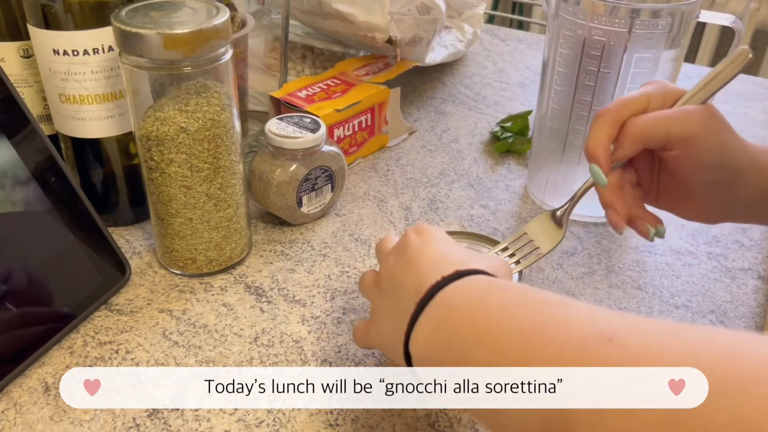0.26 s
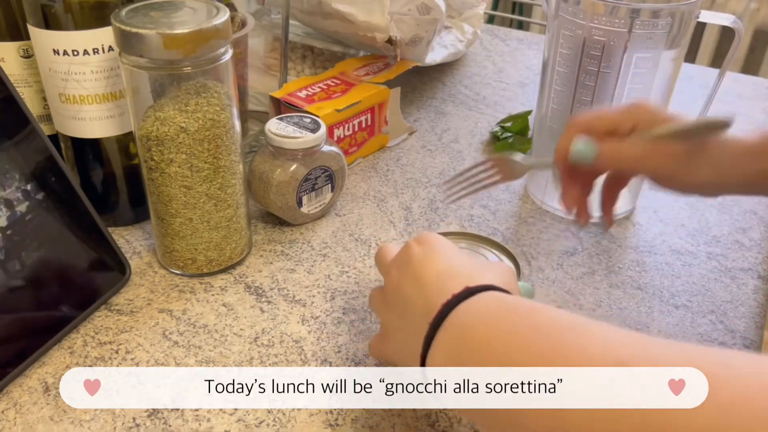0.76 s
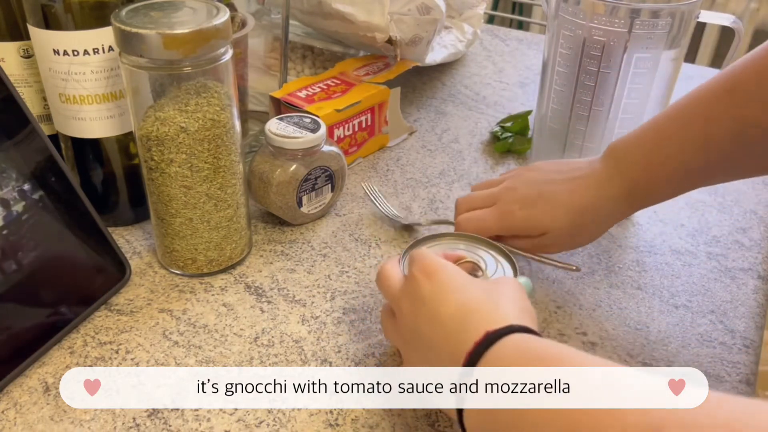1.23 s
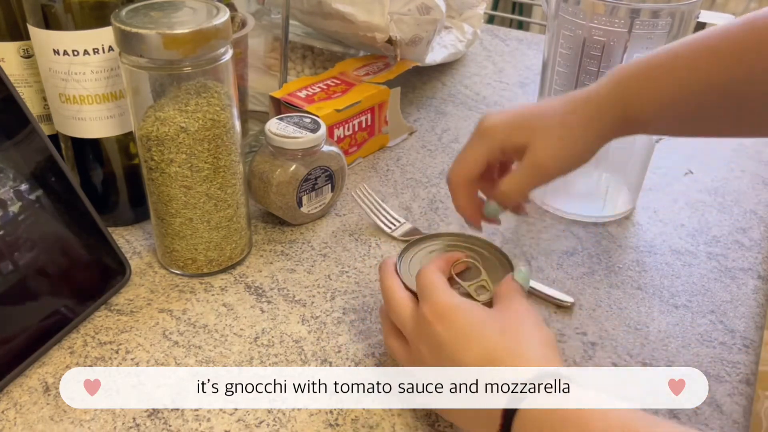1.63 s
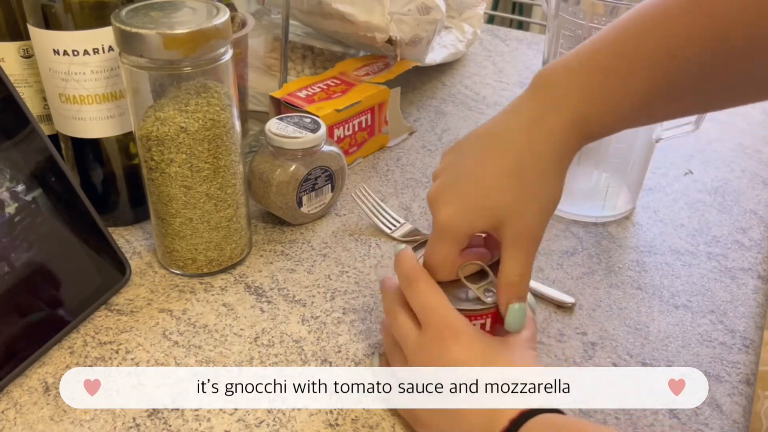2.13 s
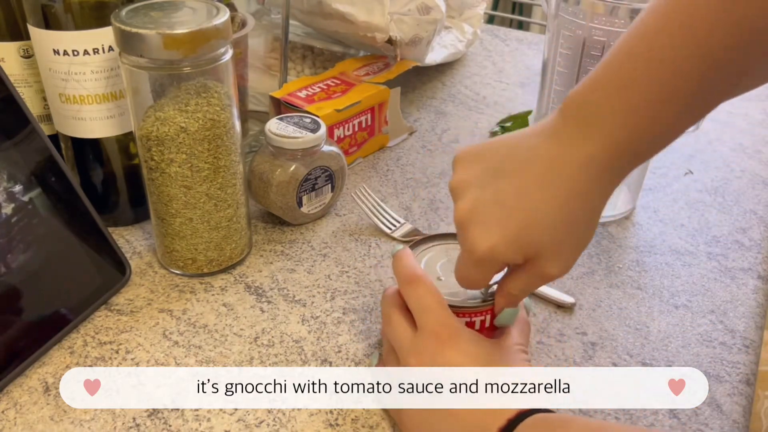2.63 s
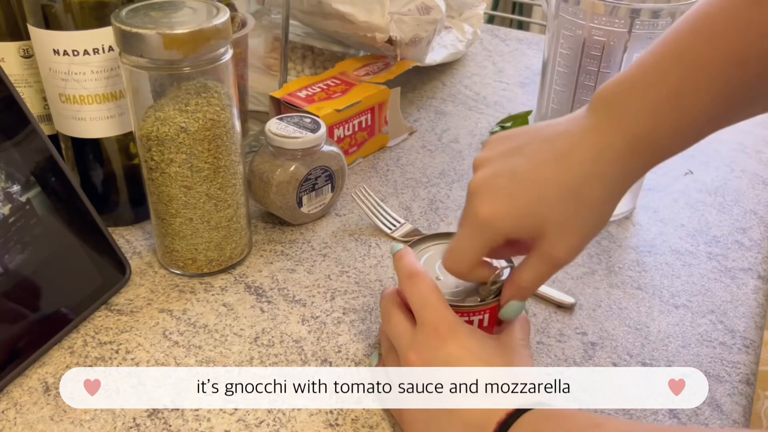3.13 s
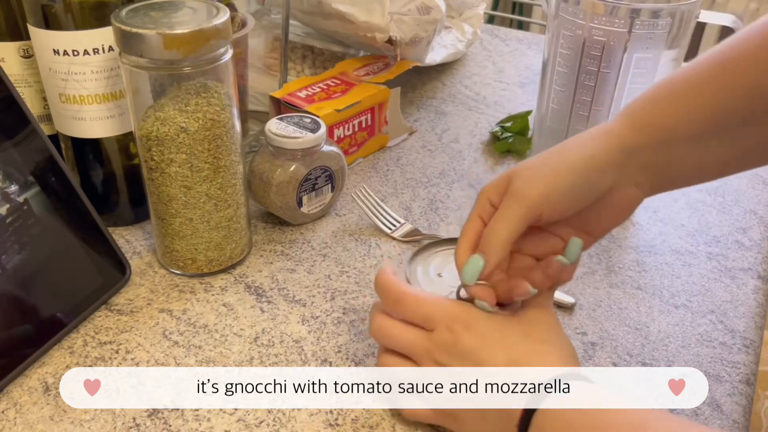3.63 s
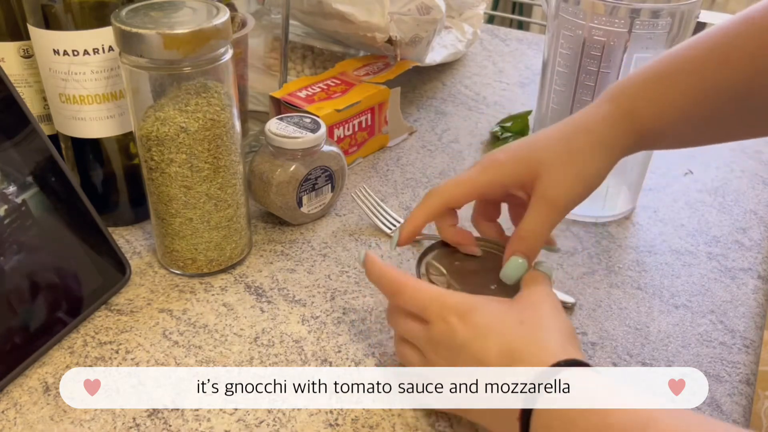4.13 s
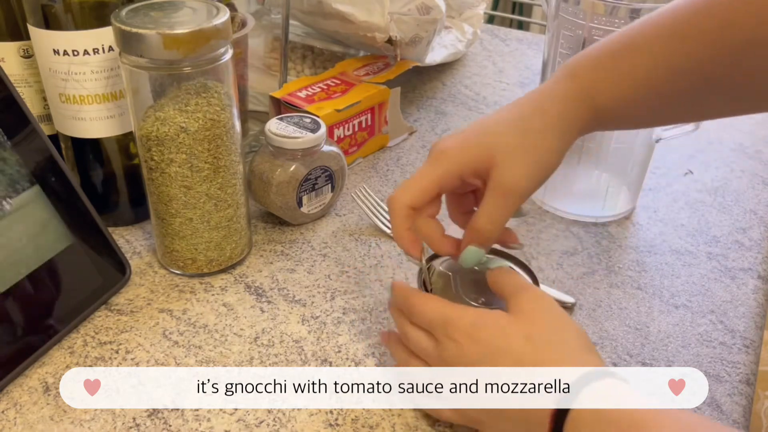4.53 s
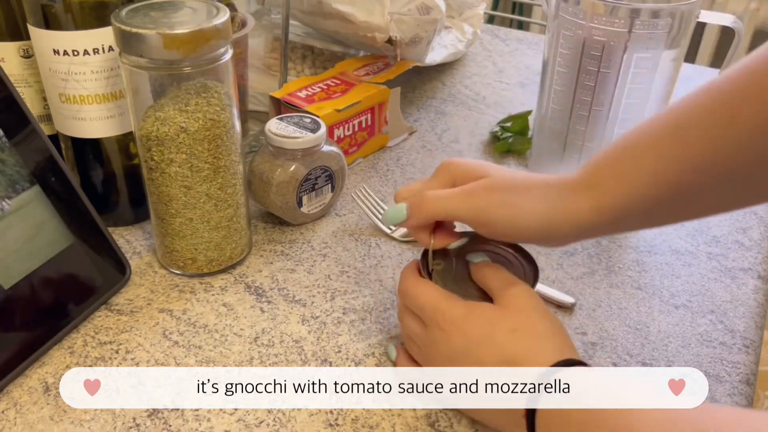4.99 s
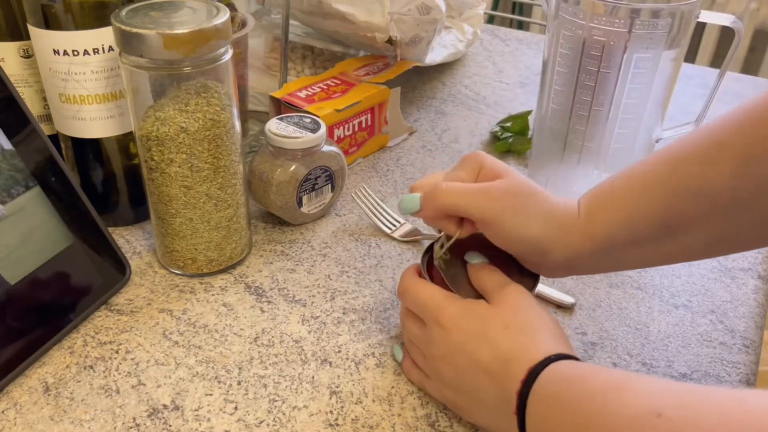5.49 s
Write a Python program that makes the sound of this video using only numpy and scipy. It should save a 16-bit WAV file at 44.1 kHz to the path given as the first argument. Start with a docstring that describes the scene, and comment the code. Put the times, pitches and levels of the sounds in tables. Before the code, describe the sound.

Light fork clicks, a metal can knocking and scraping on stone, and a ring-pull lid cracking open in an echoing kitchen.

```python
"""A hard-walled kitchen with a stone counter. A fork pecks at the ring pull of a tin can and is laid down
ringing. The can is shoved and dragged round, its rim sticking and slipping on the stone and shaking the
counter. Fingers brush the tin, nails tick on the tab, and the thin lid pops as the seal cracks. The can
is turned again; the score line starts to rip and the fold of the lid creaks. The walls echo."""
import sys
import numpy as np
from scipy import signal
from scipy.fft import rfft, irfft, next_fast_len
from scipy.io import wavfile
from scipy.ndimage import uniform_filter1d

SR = 44100
rng = np.random.default_rng(int(sys.argv[2]) if len(sys.argv) > 2 else 0)


def file_out(sig):
    """Save sig as 16-bit WAV at sys.argv[1]."""
    # one column per channel
    cols = np.atleast_2d(sig).T
    # limit, then scale
    lim = np.clip(cols, -1, 1)
    pcm = np.round(lim * 32767).astype(np.int16)
    wavfile.write(sys.argv[1], SR, pcm)


N = 253575


def amp(db):
    """Decibels to gain."""
    return 10 ** (np.asarray(db) / 20)


def unit(x):
    """x at rms 1."""
    return x / np.sqrt(np.mean(x ** 2) + 1e-20)


def along(points, hz):
    """(f/Hz, value) points read on a log axis."""
    f, v = np.transpose(points)
    return np.interp(np.log(hz + 1), np.log(f + 1), v)


def add(track, at_s, sound):
    """Mix a sound into the track."""
    part = track[..., round(at_s * SR):][..., :sound.shape[-1]]
    part += sound[..., :part.shape[-1]]


def swell(peak_s, rise_s=.043, fall_s=.037, hold_s=0):
    """Gain that rises to 1, holds and falls; 22.5 dB down at rise_s before and fall_s after."""
    t = np.arange(N) / SR - peak_s
    away = np.maximum(0, np.maximum(-t / rise_s, (t - hold_s) / fall_s))
    return amp(-22.5 * np.minimum(away, 10) ** 1.266)


def wander(*spans_samples):
    """Slow random drift at rms 1: noise through moving averages."""
    drift = rng.standard_normal(N)
    for span in spans_samples:
        drift = uniform_filter1d(drift, span)
    return unit(drift)


def colour(x, spectrum, resonances=()):
    """Minimum-phase filter: spectrum (f/Hz, level/dB) plus resonances (f/Hz, width/Hz, lift/dB)."""
    m = 2 * next_fast_len(x.shape[-1] // 2 + 4096)
    hz = np.fft.rfftfreq(m, 1 / SR)
    peaks_db = sum(lift / (1 + (2 * (hz - f) / width) ** 2) for f, width, lift in resonances)
    cepstrum = irfft(np.log(amp(along(spectrum, hz) + peaks_db)))
    cepstrum[1:m // 2] *= 2
    cepstrum[m // 2 + 1:] = 0
    return irfft(rfft(x, m) * np.exp(rfft(cepstrum)), m)[..., :x.shape[-1]]


def resonate(x, hz, width_hz):
    """What one resonance picks out of x, at rms 1."""
    return unit(signal.lfilter(*signal.iirpeak(hz, hz / width_hz, SR), x))


def burst_spectrum(samples, t60_s):
    """Nearly flattened spectrum of a decaying noise burst."""
    t = np.arange(samples) / SR
    burst = rfft(rng.standard_normal(samples) * amp(-60 * t / t60_s))
    return burst / np.abs(burst) ** .8


def blow(spectrum, t60_s, resonances=(), lag_cycles=2.7):
    """A contact shakes crowded, damped modes; rms 1 over the first 10 ms."""
    m = SR // 2
    # The lows arrive just after the highs, giving each knock a quick downward sweep.
    lag = np.exp(-2j * np.pi * lag_cycles * np.log(np.fft.rfftfreq(m, 1 / SR) + 100))
    burst = irfft(burst_spectrum(m, t60_s) * lag, m)[:SR // 4]
    x = colour(burst, spectrum, resonances)
    return np.pad(x, (0, SR * 3 // 4 - len(x))) / np.sqrt(np.mean(x[:SR // 100] ** 2))


def ring(modes, attack_s=.00018):
    """Damped modes (f/Hz, level/dB, t60/s), struck at new strengths; rms 1 before attack and decay."""
    t = np.arange(SR * 3 // 4) / SR
    hz, db, t60_s = np.transpose(modes)[:, :, None]
    level = amp(db + rng.standard_normal(hz.shape) - 60 * t / t60_s)
    x = np.sum(level * np.sin(2 * np.pi * (hz * t + rng.random(hz.shape))), 0)
    return x * (1 - np.exp(-t / attack_s)) / np.sqrt(np.sum(level[:, 0] ** 2) / 2)


def friction(rate_hz, jitter, spread_db, hiss_db):
    """Stick-slip pulses of uneven spacing and size over the hiss of the finest roughness."""
    gap_draw, size_draw = rng.standard_normal((20000, 2)).T
    at = (np.cumsum(np.exp(jitter * gap_draw)) * SR / rate_hz).astype(int)
    size = amp(spread_db * np.clip(size_draw, -2, 2))
    slips = np.bincount(at[at < N], size[at < N], N)
    return unit(slips - slips.mean()) + amp(hiss_db) * rng.standard_normal(N)


# Echo decay: f/Hz, t60/s
ECHO_T60 = [(60, 0.97), (200, 0.43), (700, 0.47), (1600, 0.55), (4000, 0.51), (7000, 0.47), (12000, 0.19),
            (16000, 0.26)]
# Echo likeness: f/Hz, left-right correlation
ECHO_COHERENCE = [(100, 0.89), (290, 0.99), (640, -0.15), (1400, -0.1), (3000, 0.0073), (7000, -0.056),
                  (9300, 0.93), (12000, 0.82), (15000, .1)]
def in_kitchen(x, wet_db, left_db=1):
    """Direct sound plus the diffuse echo of hard walls, in stereo."""
    hz, t, noise = signal.stft(rng.standard_normal((2, int(.8 * SR))), SR, nperseg=256)
    t60_s = along(ECHO_T60, hz)[:, None]
    angle = np.arccos(np.clip(along(ECHO_COHERENCE, hz), -1, 1))[:, None] / 2
    tail = noise * amp(-60 * t / t60_s) * (1 - np.exp(-t / .004))
    tail *= np.array([np.cos(angle), np.sin(angle)])
    mid, side = signal.istft(tail, SR, nperseg=256)[1] * np.sqrt(np.log(1e6) / (SR * t60_s.mean()))
    response = amp(wet_db) * np.array([mid + side, mid - side])
    response[:, 0] += amp([left_db / 2, -left_db / 2])
    return signal.fftconvolve(x[None], response, axes=1)[:, :N] / np.hypot(1, amp(wet_db))


# Room noise: f/Hz, level/dB
MURMUR = [(25, 9), (60, -1.5), (150, -5.5), (300, -2), (900, -28), (1900, -19.5), (2700, -36.5),
          (5000, -35.5), (8000, -26), (12000, -24.5), (13500, -41.5), (16000, -47)]
def house_murmur():
    """The low murmur of the house and a faint hiss."""
    common, left, right = colour(rng.standard_normal((3, N)), MURMUR)
    return amp(-59) * unit(common + .22 * np.array([left, right]))


# Finger strokes: t/s, length/s, skin/dB, fizz/dB
STROKES = [(1.343, 0.022, -59, -80), (1.935, 0.36, -64.5, -76.5), (2.66, 0.039, -64.5, -82.5),
           (3.005, 0.14, -62.5, -64.5), (3.366, 0.12, -72, -63), (3.51, 0.14, -51.5, -66),
           (3.756, 0.077, -63, -67), (4.028, 0.3, -57, -67), (4.534, 0.393, -64, -87)]
# Skin rub, its fizz, nail slide: f/Hz, level/dB
SKIN_RUB = [(1500, -35.5), (2800, 7.5), (4200, 3.5), (5800, 5.5), (8000, -5.5), (12500, -11), (16000, -6.5)]
SKIN_FIZZ = [(6000, -29.5), (10000, -13.5), (12500, -5), (14000, -2.5), (16000, -7.5)]
NAIL_SLIDE = [(3500, -21), (5000, -4), (7200, 5), (9000, -11), (13000, -19), (16000, -14)]
# Resonances under skin and nail: f/Hz, width/Hz, lift/dB
SKIN_PEAKS = [(3820, 220, 3), (5460, 350, 7)]
SLIDE_PEAKS = [(5240, 400, 11), (6750, 300, 4)]
def fingers():
    """Fingers brush the tin with a fine fizz; one nail slides along the tab and makes it sing."""
    pressures = [swell(s, hold_s=length_s) for s, length_s, _, _ in STROKES]
    _, _, skin_db, fizz_db = np.transpose(STROKES)
    rub = friction(rate_hz=250, jitter=.9, spread_db=-.5, hiss_db=2)
    skin = amp(skin_db) @ pressures * unit(colour(rub, SKIN_RUB, SKIN_PEAKS))
    fizz = amp(fizz_db) @ pressures * unit(colour(rub, SKIN_FIZZ))
    sliding = friction(rate_hz=500, jitter=.7, spread_db=3, hiss_db=0)
    nail = amp(-48.5) * swell(3.52, .085, .07) * unit(colour(sliding, NAIL_SLIDE, SLIDE_PEAKS))
    return in_kitchen(skin + fizz + nail, wet_db=3)


# Nail flicks: t/s, click/dB, tab/dB, freedom to ring/0-1, tab f/Hz, click f/Hz
FLICKS = [(2.6628, -56, -42.5, 1, 3800, 8400), (2.8006, -53.5, -51, 0.66, 3640, 12760),
          (3.1102, -37.5, -30.5, 1, 3733, 12600), (3.409, -47, -76, .3, 3700, 12700),
          (4.0085, -46, -38, 1, 3600, 12500), (4.0485, -41.5, -38, 0.6, 3890, 6300),
          (4.0986, -42.5, -43.5, 1, 3860, 13500), (4.1666, -51, -37.5, 0.2, 3470, 11900),
          (4.3, -43.5, -42.5, 0.5, 3560, 6660), (4.386, -54.5, -64, .4, 3700, 7400),
          (4.4361, -46.5, -60, 0.1, 3630, 6700), (4.985, -60.5, -56.5, 0.24, 3700, 6940)]
# Blows of nail on tin, on the tab, on the can's base: f/Hz, level/dB
NAIL_CLICK = [(700, -25), (2200, -13), (4000, -7.5), (7000, -5), (9000, -2), (13000, -0.5), (16000, -4)]
TAB_BLOW = [(300, 2), (900, -1.5), (2000, 1), (3800, -3.5), (5000, -5), (8000, -11.5), (14000, -28.5)]
BASE_KNOCK = [(150, -33.5), (280, -5.5), (380, -2.5), (520, -1.5), (680, -13), (900, -10), (1400, -11),
              (4000, -65)]
# Resonances of the tab and of the full can on stone: f/Hz, width/Hz, lift/dB
TAB_PEAKS = [(1110, 180, 16.5), (1428, 27, 8.5), (1900, 150, 13.5), (2165, 120, 8.5), (2380, 110, -1),
             (2980, 380, 8), (3190, 100, -12), (3786, 410, 15)]
CAN_PEAKS = [(358, 27, 2.5), (454.5, 18, 3), (503.7, 110, 5), (650.6, 53, 10), (741, 7.8, 5),
             (808, 30, 4.5), (993, 30, 8), (1102, 19, 1.5), (1209, 30, 6), (1262, 41, 7.5),
             (1364, 110, 0.5), (1377, 62, 5), (1726, 45, 8), (2140, 11, 7), (2900, 31, 1), (3324, 72, 8)]
def tab_ticks():
    """Nails flick rim and tab; the tab shifts pitch as it bends and rings less under a finger."""
    out = np.zeros((2, N))
    for s, click_db, tab_db, freedom, tab_hz, click_hz in FLICKS:
        bend = tab_hz / TAB_PEAKS[-1][0]
        peaks = [(hz * bend, width, freedom * lift) for hz, width, lift in TAB_PEAKS]
        ping = freedom * amp(-11) * ring([(tab_hz, 0, .053)])
        tab = blow(TAB_BLOW, .015, peaks) + ping + amp(-20) * blow(BASE_KNOCK, .021, CAN_PEAKS)
        click = blow(NAIL_CLICK, .016, [(click_hz, 1300, 9.5)], lag_cycles=1.2)
        add(out, s, in_kitchen(amp(click_db) * click + amp(tab_db) * tab, wet_db=-2.5))
    return out


# Tine contacts: t/s, click/dB, thump/dB, knock/dB, tin/dB, tines/dB
PECKS = [(0.191, -48, -51, -45.5, -64, -76), (0.366, -36.5, -40.5, -45.5, -37, -55),
         (0.462, -38.5, -54.5, -42.5, -50, -79), (1.09, -49, -51, -41, -78, -37.5)]
# Blow on the can's wall, sharp click, damped clink of tines: f/Hz, level/dB
WALL_KNOCK = [(500, -39.5), (900, -4), (1400, -3.5), (2000, -4), (2600, -20), (4000, -25), (8000, -43.5)]
SHARP_CLICK = [(700, -27), (2200, -9), (4000, -2), (7000, 0), (9000, -2), (13000, 1.5), (16000, -6.5)]
DAMPED_CLINK = [(1500, -15), (2600, -2), (6000, -4.5), (9000, -7), (16000, -14)]
# Resonances of rim and tines: f/Hz, width/Hz, lift/dB
RIM_PEAKS = [(1260, 25, 10), (1530, 41, 14.5), (1897, 570, 10.5), (2350, 150, 9.5), (2900, 310, 6.5),
             (3370, 270, -5), (4040, 130, 4.5), (4550, 250, -5), (5030, 110, 8), (6020, 140, 8.5),
             (6715, 270, -11), (13000, 1200, 7)]
TINE_PEAKS = [(3000, 350, 15.5), (3650, 250, -5.5), (4480, 220, 5), (5460, 400, 7.5)]
# Modes of counter and tines: f/Hz, level/dB, t60/s
COUNTER_MODES = [(60.6, -6.5, 0.75), (79, -11.5, 0.49), (118.4, 0.5, 0.49), (164.8, 12.5, 0.17)]
TINE_MODES = [(3020, -16.5, .15), (7736, -5, 0.26), (9680, -3, 0.07), (10740, -7, 0.42), (15320, 3, 0.06)]
def fork_pecks():
    """The tines peck at the tab, then touch down on the counter."""
    out = np.zeros((2, N))
    for s, click_db, thump_db, knock_db, tin_db, tines_db in PECKS:
        thump = amp(thump_db) * ring(COUNTER_MODES, attack_s=.0054)
        knock = amp(knock_db) * blow(BASE_KNOCK, .035, CAN_PEAKS)
        tin = amp(tin_db) * blow(WALL_KNOCK, .07, RIM_PEAKS)
        click = amp(click_db) * blow(SHARP_CLICK, .02, RIM_PEAKS)
        tines = amp(tines_db) * (ring(TINE_MODES) + amp(-5.5) * blow(DAMPED_CLINK, .04, TINE_PEAKS))
        add(out, s, in_kitchen(thump + knock + tin + click + tines, wet_db=2))
    return out


# Fork heel on stone: f/Hz, level/dB
HEEL_KNOCK = [(150, -25), (270, -15.5), (360, -5.5), (460, -0.5), (600, -6), (1250, -6), (1700, -11.5),
              (2100, -17.5), (2500, -31), (3100, -29.5), (4000, -39.5), (8000, -42), (14000, -63.5)]
# Its resonances: f/Hz, width/Hz, lift/dB
HEEL_PEAKS = [(465, 98, 4.8), (653, 37, 2.8), (781, 48, 4), (1010, 70, 9.3), (1230, 60, 2.1)]
def fork_heel():
    """The heel of the fork drops on the stone with a dull knock."""
    out = np.zeros((2, N))
    knock = amp(-26) * blow(HEEL_KNOCK, .042, HEEL_PEAKS)
    thump = amp(-40.5) * ring(COUNTER_MODES, attack_s=.0057)
    add(out, 1.191, in_kitchen(knock + thump, wet_db=1))
    return out


# Fork strikes: t/s, tips/dB, stem/dB, click/dB
FORK_STRIKES = [(1.094, -56, -67, -46), (1.513, -31, -20.5, -21), (1.561, -38.5, -30, -45)]
# Modes of stem and tine tips: f/Hz, level/dB, t60/s
STEM_MODES = [(972, -9, 1.9), (1571, -2, .6), (1718, -5, .7), (2169, 1, .95), (2394, -2, .5),
              (2768, -2, .5), (3316, -3, .45), (3403, -5, .4), (3461, 0, .78), (5247, -20, 1.1),
              (6944, -16, .85)]
TIP_MODES = [(11855, 0, .38), (11981, -1, .27)]
def fork_clinks():
    """The fork rings as it lands and as the can bumps it; two high modes beat at the tips."""
    out = np.zeros((2, N))
    for s, tips_db, stem_db, click_db in FORK_STRIKES:
        add(out, s, in_kitchen(amp(click_db) * blow(SHARP_CLICK, .012), wet_db=0))
        add(out, s, in_kitchen(amp(stem_db) * ring(STEM_MODES), wet_db=-10))
        add(out, s, amp(tips_db) * ring(TIP_MODES) * amp([[-1], [1]]))
    return out


# Pushes on the can: peak t/s, rise/s, fall/s, scrape/dB, thrum/dB, grip f/Hz
PUSHES = [(0.005, 0.071, 0.032, -52.5, -49, 504), (0.167, 0.072, 0.043, -46.5, -42.5, 373),
          (0.368, 0.034, 0.065, -45.5, -44, 402), (0.89, 0.17, 0.2, -59, -54, 513),
          (1.39, 0.13, 0.026, -53, -76, 770), (2.009, 0.056, 0.058, -32, -34, 499.5),
          (2.285, 0.16, 0.077, -59.5, -58, 500), (2.751, 0.39, .15, -51, -59.5, 520),
          (3.07, 0.11, 0.19, -55, -64.5, 480), (3.385, 0.15, 0.079, -55, -61, 513),
          (3.505, 0.16, 0.16, -45, -66, 520), (3.641, 0.088, 0.049, -21, -34, 677),
          (3.799, 0.19, 0.07, -31.5, -41.5, 902), (4.04, 0.073, 0.13, -48, -51, 746),
          (4.236, 0.11, 0.066, -28, -41.5, 1223), (4.57, 0.033, 0.039, -51, -54.5, 484),
          (4.705, 0.079, 0.039, -46, -46.5, 494), (4.862, 0.11, 0.073, -36, -53, 536),
          (4.95, 0.078, 0.039, -51, -42.5, 490)]
# Rubbing base, shaken counter: f/Hz, level/dB
BASE_RUB = [(190, -41.5), (300, -7.5), (450, 4.5), (700, 1), (1100, 1.5), (1500, -4.5), (2100, -8),
            (2900, -20.5), (5000, -53), (10000, -73.5)]
COUNTER_THRUM = [(25, -44.5), (48, -21.5), (66, -6.5), (90, -5), (120, 0), (137, -7.5), (153, 7),
                 (180, -12.5), (230, -13), (350, -55.5)]
def can_shoves():
    """The can is eased round: its base rubs in short pushes and rings at a pitch set by each grip."""
    force = amp(1.8 * wander(600, 300))
    slips = friction(rate_hz=180, jitter=.5, spread_db=2.5, hiss_db=-8)
    smear = irfft(burst_spectrum(1024, t60_s=.012))  # each slip spreads as it crosses the can
    rub = force * unit(signal.fftconvolve(slips, smear)[:N])
    rasp = unit(colour(rub, BASE_RUB, CAN_PEAKS))
    base, shaking = np.zeros((2, N))
    for s, rise_s, fall_s, scrape_db, thrum_db, grip_hz in PUSHES:
        grip_ring = amp(-7) * resonate(rub, grip_hz, width_hz=17)
        base += amp(scrape_db) * swell(s, rise_s, fall_s) * (rasp + grip_ring)
        # The counter shakes longer, and most as the can slows.
        shaking += amp(thrum_db) * swell(s + .46 * fall_s, 1.37 * rise_s, 1.37 * fall_s)
    thrum = shaking * unit(colour(rub, COUNTER_THRUM))
    return in_kitchen(base, wet_db=1) + in_kitchen(thrum, wet_db=-6.5)


# Catches of the base: t/s, click/dB, thump/dB, knock/dB, tin/dB
CATCHES = [(1.4494, -38, -49, -22.5, -21.5), (1.4884, -39, -60, -26, -28), (1.4924, -32, -29, -17, -19.5),
           (1.514, -13, -28.5, -16, -10), (1.5624, -14.5, -39, -23, -14), (1.596, -19, -48, -23, -17.5),
           (1.629, -20.5, -56, -35, -19), (1.824, -65, -42, -25, -38), (1.847, -54, -49.5, -34.5, -35),
           (3.792, -50, -49.5, -36, -38.5), (4.506, -80, -67, -37, -47), (4.537, -85, -46, -32.5, -45),
           (4.804, -77, -55.5, -38.5, -55)]
# Click on stone: f/Hz, level/dB
STONE_CLICK = [(1200, -20), (2600, 13.5), (3400, 3.5), (4500, -3), (7000, -2), (9000, -19), (13000, -14),
               (16000, -32.5)]
def can_knocks():
    """The base of the can catches on the stone and knocks free."""
    out = np.zeros((2, N))
    for s, click_db, thump_db, knock_db, tin_db in CATCHES:
        thump = amp(thump_db) * ring(COUNTER_MODES, attack_s=.0037)
        knock = amp(knock_db) * blow(BASE_KNOCK, .019, CAN_PEAKS)
        tin = amp(tin_db) * blow(WALL_KNOCK, .032, CAN_PEAKS)
        click = amp(click_db) * blow(STONE_CLICK, .039, CAN_PEAKS)
        add(out, s, in_kitchen(thump + knock + tin + click, wet_db=1))
    return out


# Scrape and grit of the dragged rim: f/Hz, level/dB
RIM_SCRAPE = [(190, -41.5), (280, -8), (370, -0.5), (560, -4), (780, -3), (1100, -3), (1600, -2.5),
              (2300, -10.5), (3200, -30), (5000, -50.5), (10000, -63)]
RIM_GRIT = [(1500, -20), (2600, 4.5), (3400, -2), (4300, -7), (7000, -13.5), (9000, -21.5), (12500, -23.5),
            (16000, -36)]
def can_drag():
    """The rim judders over the stone in clumps of slips and shakes the counter; the scrape dulls."""
    start_s, peak_s, hold_s, end_s = 1.456, 1.607, .067, 1.93
    rise_db_per_s, fall_db_per_s, dulling_db_per_s = 57, 108, 27.5
    thrum_spectrum = [(25, -27.5), (60, -9.5), (90, -1), (120, -2), (150, -3), (230, -9.5), (400, -44)]
    t = np.arange(N) / SR - peak_s
    moving = swell(start_s, .004, .04, hold_s=end_s - start_s)
    force = moving * amp(np.minimum(0, np.minimum(rise_db_per_s * t, fall_db_per_s * (hold_s - t))))
    judder = amp(2 * wander(350)) * friction(rate_hz=140, jitter=.45, spread_db=2, hiss_db=-3)
    scrape = force * amp(-16.5) * unit(colour(judder, RIM_SCRAPE, CAN_PEAKS))
    grit = force * amp(-25.5 - dulling_db_per_s * t) * unit(colour(judder, RIM_GRIT, CAN_PEAKS))
    thrum = force * amp(-38) * unit(colour(judder, thrum_spectrum))
    return in_kitchen(scrape + grit, wet_db=3.5) + in_kitchen(thrum, wet_db=-10)


# Squeaks of the torn edge: t/s, level/dB, f/Hz
EDGE_SQUEAKS = [(5.582, -52, 1960), (5.611, -51.5, 2300), (5.697, -57, 2660), (5.734, -57, 2700),
                (5.748, -49, 2980)]
def lid_creak():
    """The fold groans under a wavering pull; the torn edge squeaks higher as the bend tightens."""
    fold_spectrum = [(150, -18), (280, -5.5), (390, 1.5), (520, -9), (750, -19), (1400, -16.5),
                     (2200, -45), (4000, -52)]
    edge_spectrum = [(900, -6), (1900, 0), (2700, 2), (3500, -11.5), (6000, -12), (9000, -25),
                     (16000, -29)]
    pull = amp(-47.5 + 2 * wander(1500)) * swell(5.565, hold_s=.2)
    folding = friction(rate_hz=375, jitter=.6, spread_db=4, hiss_db=-8)
    chafing = friction(rate_hz=600, jitter=.6, spread_db=2.5, hiss_db=-3)
    groan = pull * unit(colour(folding, fold_spectrum))
    rasp = amp(4) * unit(colour(chafing, edge_spectrum))
    squeaks = sum(amp(db) * swell(s, .029, .011) * (rasp + resonate(rasp, hz, width_hz=200))
                  for s, db, hz in EDGE_SQUEAKS)
    return in_kitchen(groan + squeaks, wet_db=-7)


# Lid buckling, seal giving way: t/s, click/dB, thump/dB, knock/dB, lid/dB
BUCKLES = [(2.358, -46.5, -33.5, -35, -36.5), (2.4212, -22, -31.5, -31, -11),
           (5.362, -42.5, -30.5, -20.5, -27)]
# Lid pop: f/Hz, level/dB
POP = [(200, -12.5), (450, -24.5), (700, -9), (1300, -7.5), (1900, -2.5), (2400, -6.5), (3300, -14.5),
       (4500, -13), (8000, -30.5)]
# Flexing lid: f/Hz, width/Hz, lift/dB
LID_PEAKS = [(830, 93, 10.5), (1270, 47, 7), (1376, 140, 11), (1742, 220, 9.5), (2350, 140, 4.5),
             (3660, 290, 6.5), (5370, 290, -3)]
# Popped lid: f/Hz, level/dB, t60/s
LID_MODES = [(1372, -1.5, .03), (1640, 0, .022)]
def lid_snaps():
    """The thin lid pops, rings briefly and kicks the can against the counter."""
    out = np.zeros((2, N))
    for s, click_db, thump_db, knock_db, lid_db in BUCKLES:
        pop = amp(lid_db) * (blow(POP, .02, LID_PEAKS, lag_cycles=.7) + amp(-10) * ring(LID_MODES))
        click = amp(click_db) * blow(SHARP_CLICK, .016, lag_cycles=.664)
        knock = amp(knock_db) * blow(BASE_KNOCK, .0069, CAN_PEAKS)
        add(out, s, in_kitchen(pop + click + knock, wet_db=0, left_db=3))
        thump = amp(thump_db) * ring(COUNTER_MODES, attack_s=.0047)
        add(out, s, in_kitchen(thump, wet_db=-3.5))
    return out


# Tear envelope: t/s, level/dB
TEAR_LEVELS = [(5.32, -71), (5.33, -52), (5.341, -52.5), (5.352, -25), (5.364, -23), (5.372, -54)]
# Ripping tin: f/Hz, level/dB
TIN_RIP = [(300, -4), (1200, 1), (1950, 12.5), (2700, -3.5), (4000, -7), (5200, 2), (7000, 2.5), (9000, -9),
           (13000, -8.5), (16000, -17)]
def lid_tear():
    """The score line rips in tiny fractures; the sudden give jolts the can and thuds in the counter."""
    jolt_spectrum = [(250, -1.5), (520, -14.5), (800, -1.5), (1300, 2.5), (1800, -9.5), (4000, -54)]
    thud_modes = [(58, -21.5, .33), (71.5, -2.5, .22), (97.3, -8, .55)]
    t = np.arange(N) / SR
    s, db = np.transpose(TEAR_LEVELS)
    gate = np.interp(t, [s[0] - .004, s[0], s[-1], s[-1] + .03], [0, 1, 1, 0])
    fractures = friction(rate_hz=1400, jitter=.8, spread_db=4, hiss_db=0)
    rip = gate * amp(np.interp(t, s, db)) * unit(colour(fractures, TIN_RIP))
    out = in_kitchen(rip, wet_db=-4.5)
    add(out, 5.364, in_kitchen(amp(-21.5) * blow(jolt_spectrum, .043, CAN_PEAKS), wet_db=1))
    add(out, 5.369, amp(-29) * ring(thud_modes, attack_s=.0032))
    return out


def scene():
    """Fork, can and lid over the quiet of the room."""
    fork = fork_pecks() + fork_heel() + fork_clinks()
    can = can_knocks() + can_drag() + can_shoves()
    opening = fingers() + lid_snaps() + tab_ticks() + lid_tear() + lid_creak()
    return fork + can + opening + house_murmur()


# Microphone response: f/Hz, level/dB
MIC_RESPONSE = [(20, -24.5), (40, -10.5), (58, -1), (7500, -5.5), (9400, -3), (10400, -9.5), (11200, 1),
                (11850, 5.5), (12500, -6.5), (15300, -6), (16600, -32.5)]
# Two ports of unequal resonance: f/Hz, left lead/rad
PORT_LEAD = [(6000, 0), (7900, -.7), (8450, -1.6), (9000, -2.7), (10400, -3.15), (11200, -3.6),
             (11900, -4.75), (13100, -6.1), (15000, -7.2)]
def record(dry):
    """The microphone's ports colour the top octave and part in phase there; the band is limited."""
    top_hz = 16600
    m = next_fast_len(N + SR // 2)
    hz = np.fft.rfftfreq(m, 1 / SR)
    ports = np.exp(.5j * along(PORT_LEAD, hz) * np.array([[1], [-1]]))
    heard = colour(dry, MIC_RESPONSE) * amp([[.4], [-.4]])
    return irfft(rfft(heard, m) * ports * (hz < top_hz), m)[:, :N]


dry = scene()
out = record(dry)
file_out(out)
```